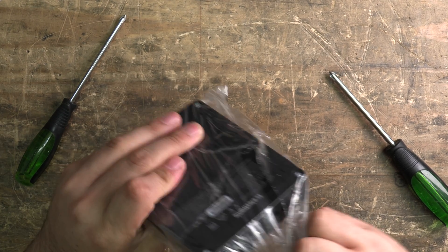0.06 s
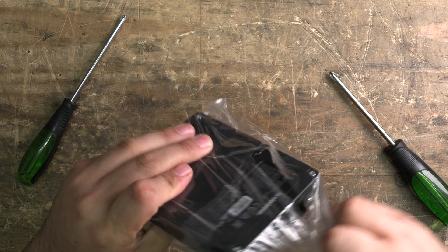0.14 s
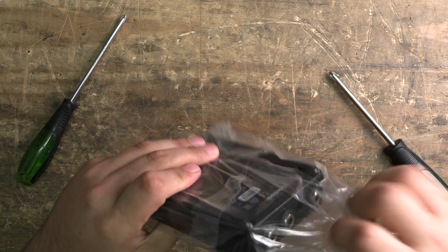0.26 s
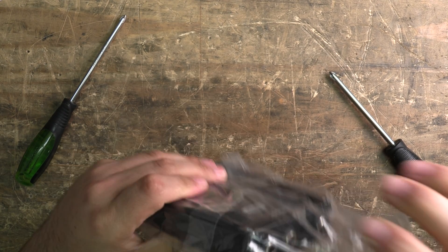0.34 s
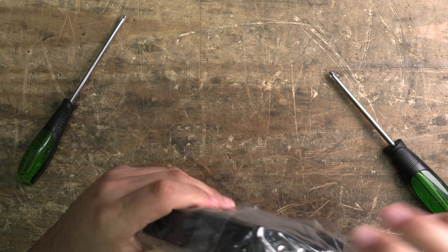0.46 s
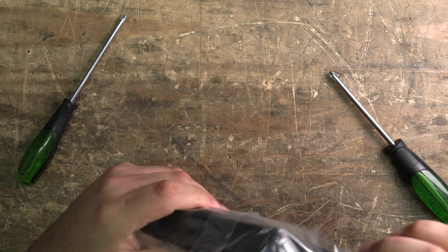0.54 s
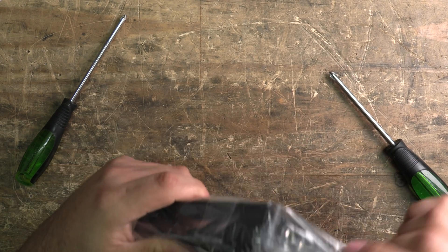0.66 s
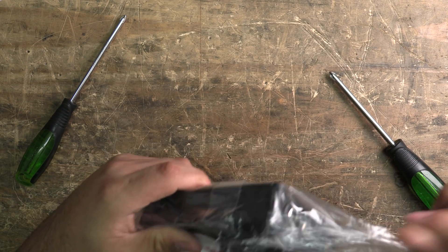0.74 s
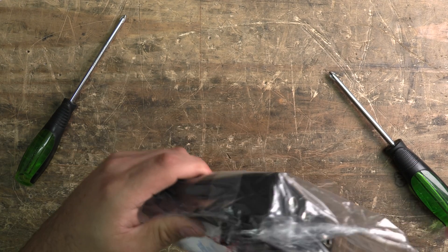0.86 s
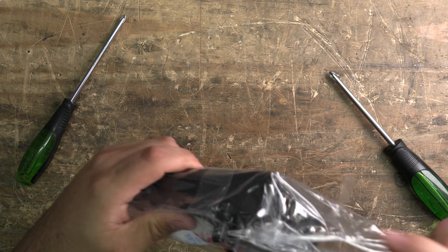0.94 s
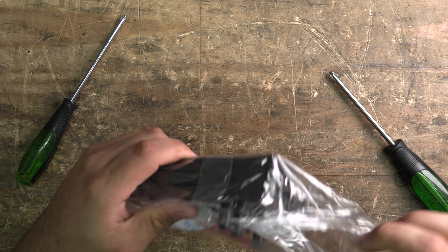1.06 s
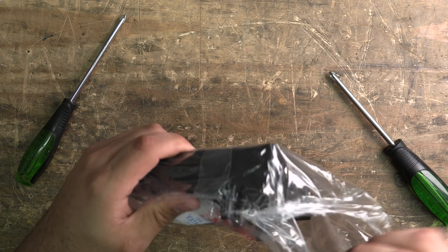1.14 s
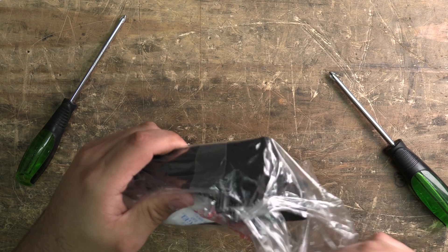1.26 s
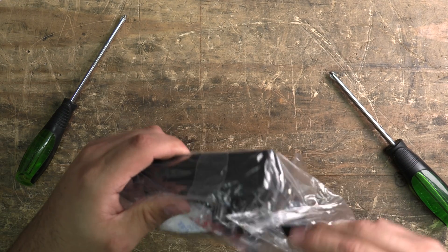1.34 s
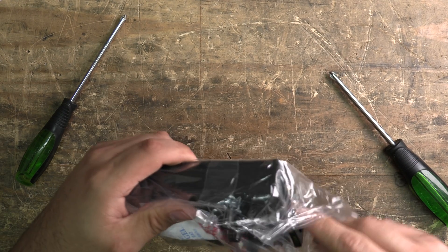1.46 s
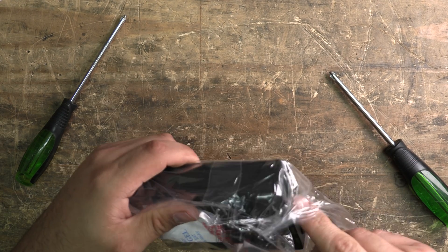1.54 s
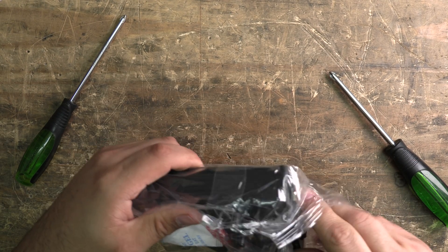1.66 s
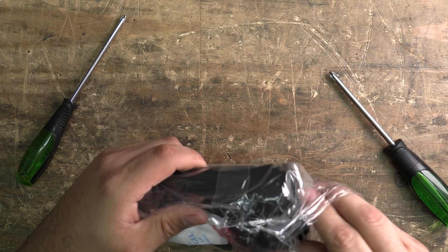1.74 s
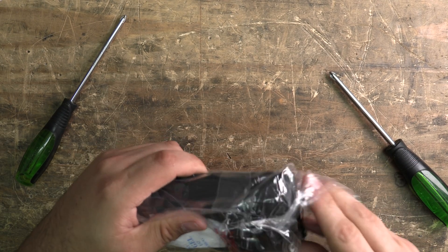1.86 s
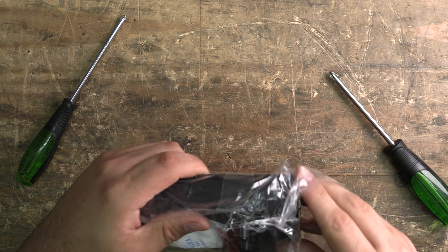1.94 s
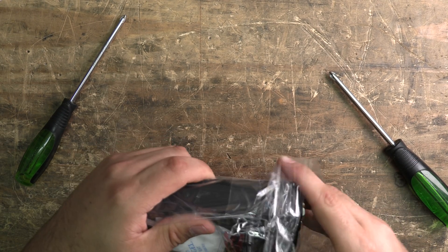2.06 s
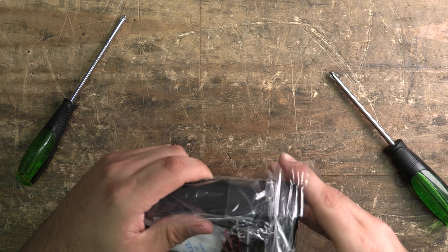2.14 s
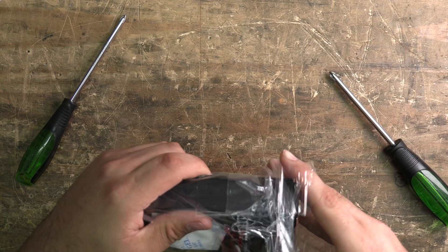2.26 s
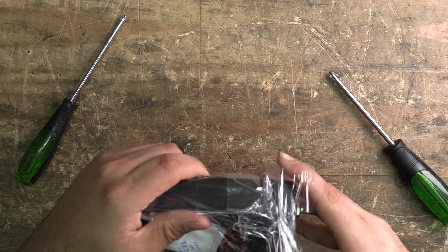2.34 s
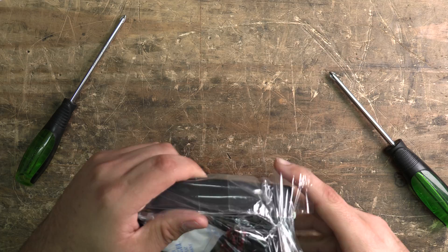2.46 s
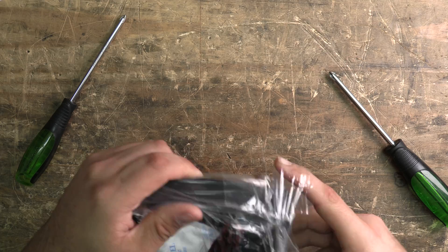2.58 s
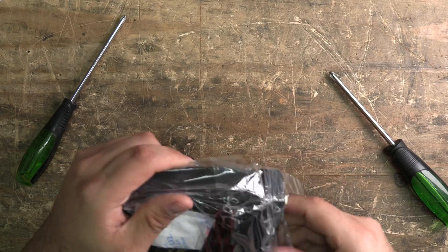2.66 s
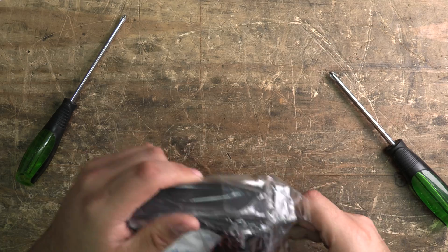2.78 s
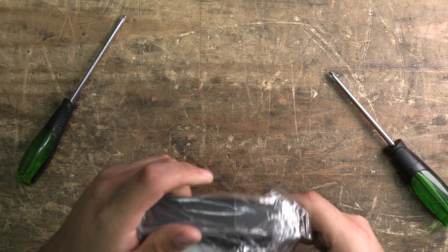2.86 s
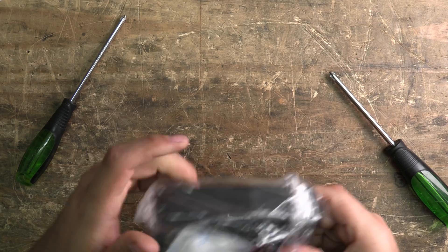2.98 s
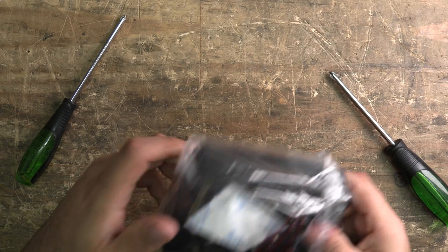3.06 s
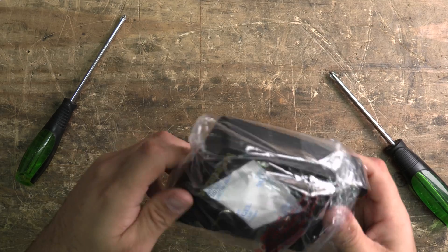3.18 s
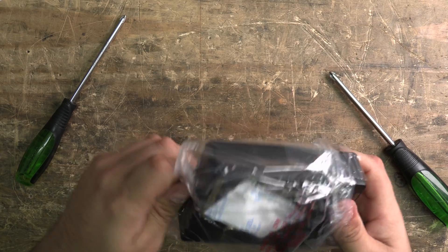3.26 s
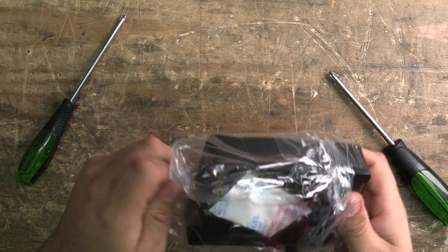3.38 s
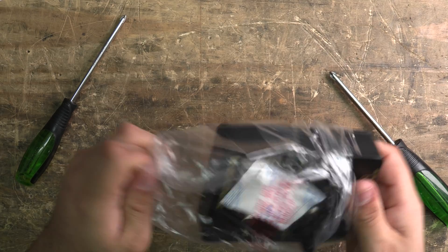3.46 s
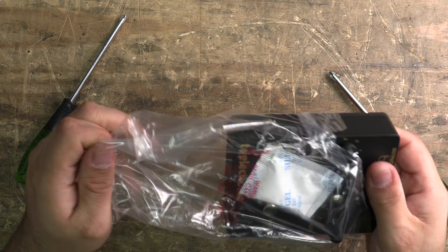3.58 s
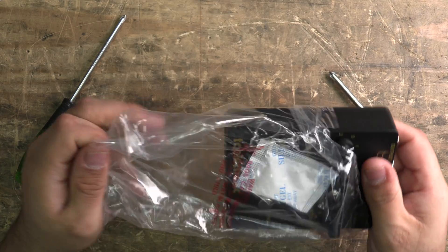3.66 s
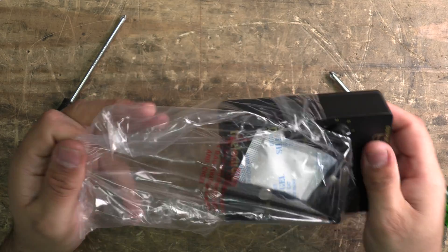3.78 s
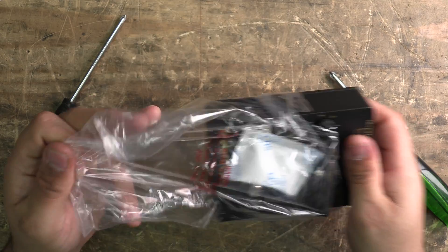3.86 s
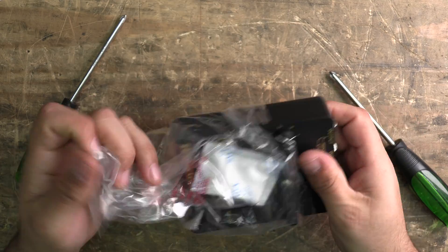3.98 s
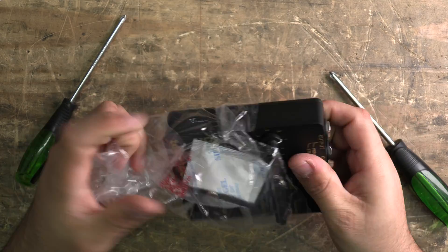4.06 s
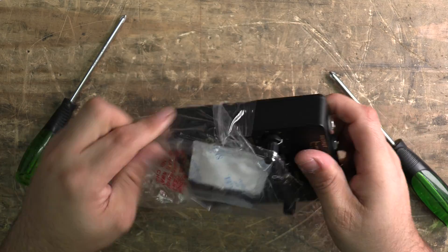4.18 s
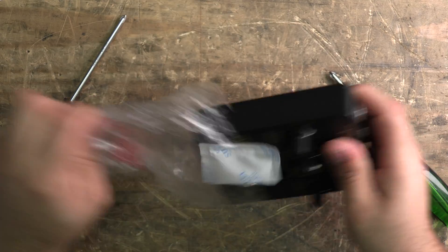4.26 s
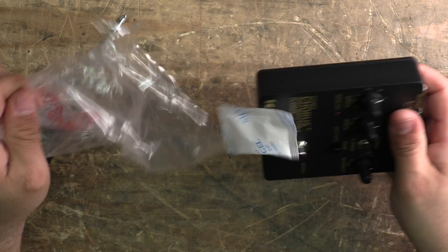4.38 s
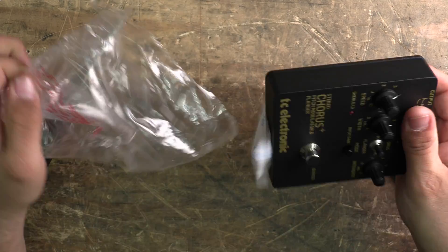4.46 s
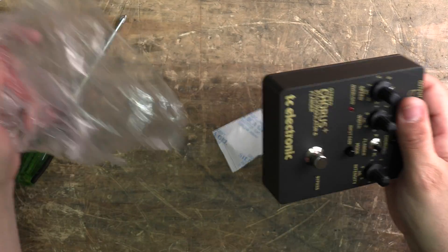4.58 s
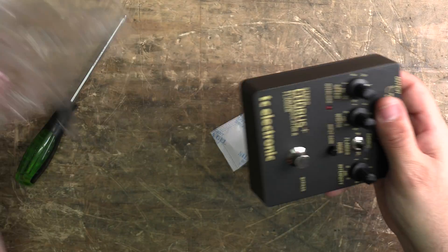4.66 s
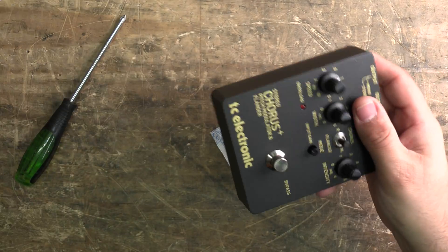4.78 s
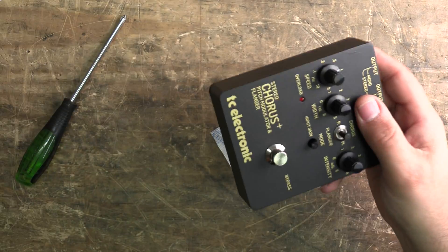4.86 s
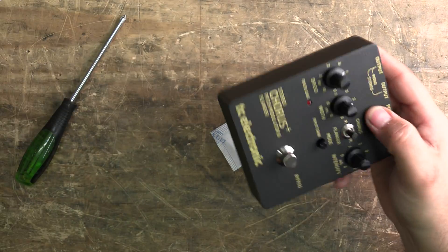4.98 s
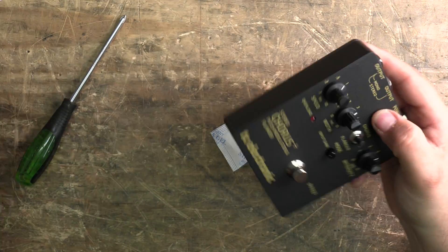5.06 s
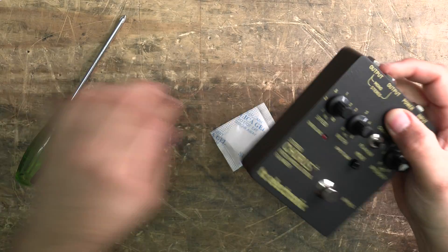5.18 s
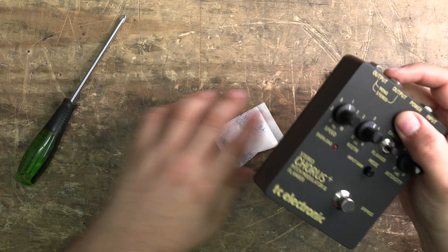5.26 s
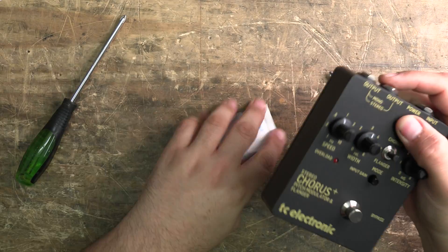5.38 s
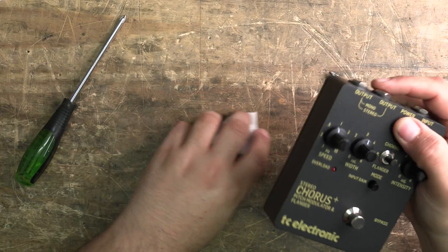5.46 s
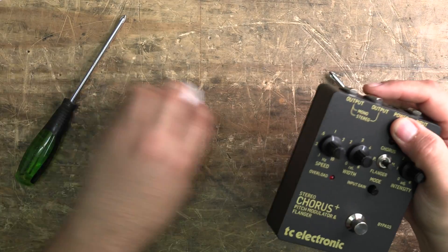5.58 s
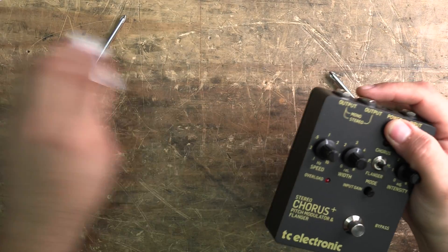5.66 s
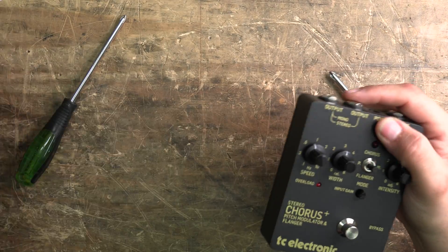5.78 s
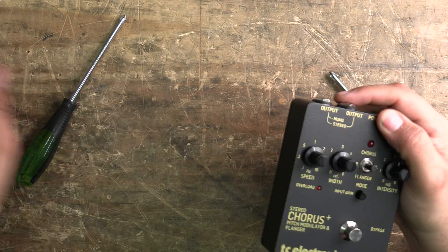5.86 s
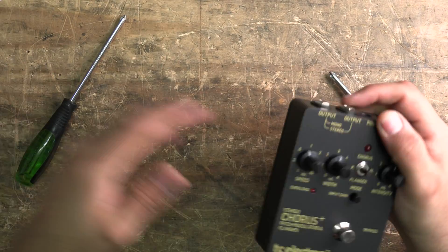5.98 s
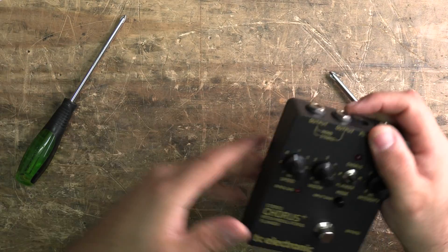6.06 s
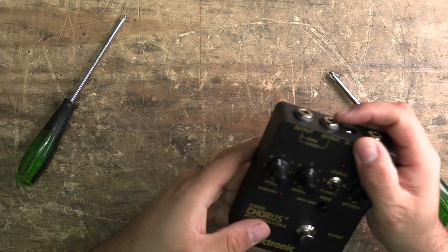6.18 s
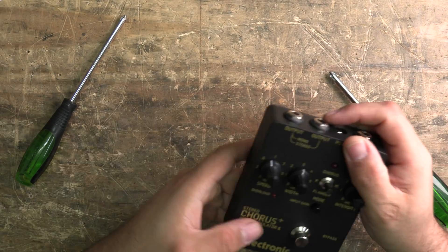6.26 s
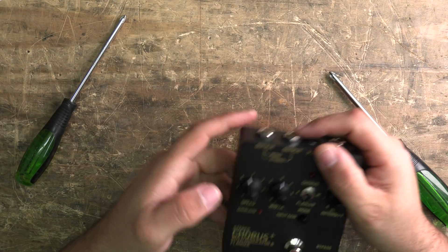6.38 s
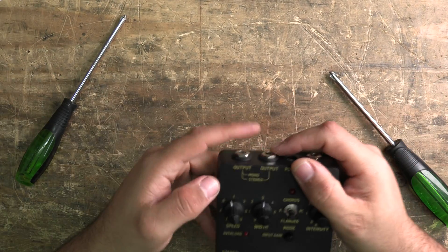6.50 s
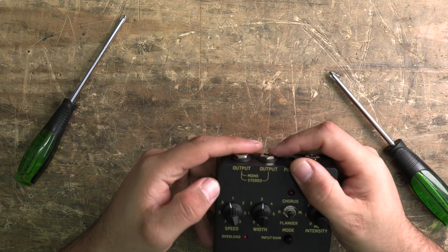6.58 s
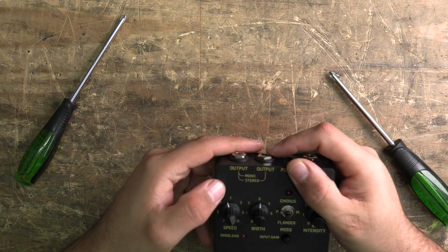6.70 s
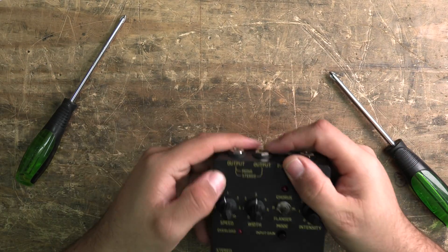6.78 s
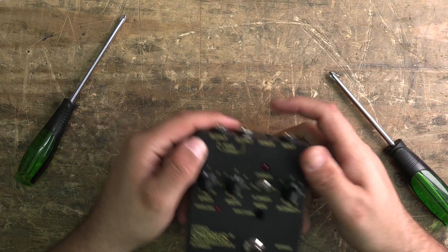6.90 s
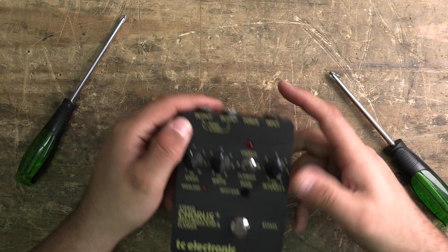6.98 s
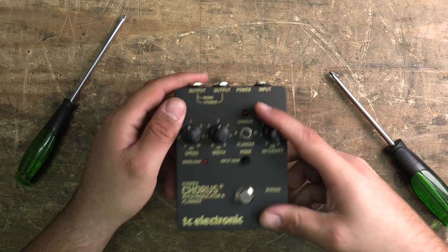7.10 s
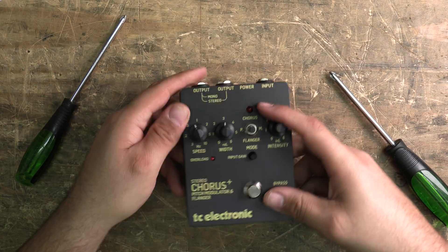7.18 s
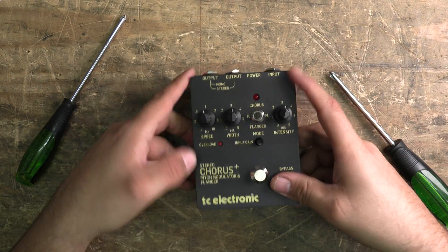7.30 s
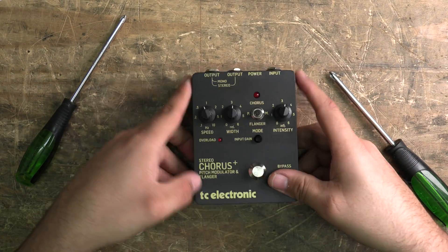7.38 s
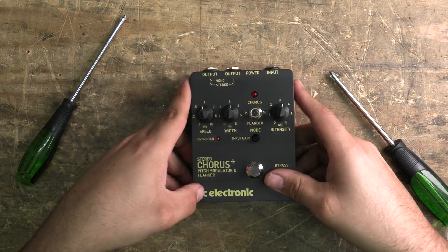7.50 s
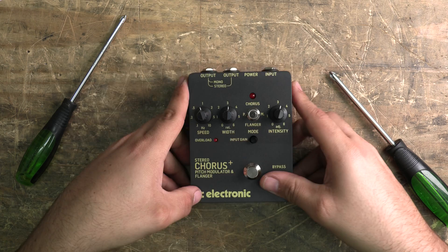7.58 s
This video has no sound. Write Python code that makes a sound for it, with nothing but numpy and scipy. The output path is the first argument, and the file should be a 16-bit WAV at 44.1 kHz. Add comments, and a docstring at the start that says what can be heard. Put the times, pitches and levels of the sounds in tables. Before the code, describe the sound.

Close up in a dry room, hands work a thin clear plastic bag off a small metal box. Bright crinkles come in quick uneven pulls, with sharp snaps and an early knock, growing strongest just before the bag comes free. A loose film crack follows, then a small paper sachet lands softly and is scraped away over wood. Faint finger rubs and taps on the casing finish above quiet rumble and hiss.

```python
"""Two hands work a thin clear plastic bag off a small metal box over a wooden bench, close by in a dry room.
The bag is swarms of buckling clicks, each ringing a patch of film; noise bursts make it jerk taut and crack
free. A paper sachet drops (short rings and puffs) and is dragged away (dense clicks and rubbing noise). Knocks
ring low modes; fingertips tap the casing. Near the end a faint airy hiss comes and goes, with steady, wavering
resonances. A quiet rumble and hiss lies beneath."""
import sys
import numpy as np
from scipy import signal
from scipy.fft import rfft, irfft
from scipy.io import wavfile
from scipy.ndimage import uniform_filter1d

SR = 44100
rng = np.random.default_rng(int(sys.argv[2]) if len(sys.argv) > 2 else 0)


def pcm_store(signal):
    """Save signal as 16-bit PCM."""
    levels = np.round(np.clip(np.atleast_2d(signal), -1, 1) * 32767)
    wavfile.write(sys.argv[1], SR, levels.astype(np.int16).T)


N = 336831

# Spectrum of the creasing film. Each row: frequency in Hz, relative density in dB per Hz.
FILM_SPECTRUM = [(650, -34.5), (1100, -1.5), (1190, -9.5), (1520, -5), (1680, -7), (1990, -4.5), (2230, -1),
                 (3080, -4.5), (3530, -7.5), (4560, -2.5), (9660, -3), (13400, -2), (15100, 0),
                 (16000, -11)]
CUTOFF_HZ, TREBLE_HZ = 16000, 6000
# a stroke climbs from -SWELL_DB to its crest and eases back; the slopes apply before and after
SWELL_DB, ATTACK_DB_PER_S, RELEASE_DB_PER_S = 12, 2499, 398.5
FREE_S = 4.57  # the bag comes off the box


def from_db(db):
    """Decibels to gain."""
    return 10 ** (np.asarray(db) / 20)


def rms_one(x):
    """Scale to rms 1."""
    return x / np.sqrt(np.mean(x ** 2) + 1e-20)


def add(out, s, sound):
    """Mix a short sound in at time s."""
    i = max(round(s * SR), 0)
    out[i:i + len(sound)] += sound[:N - i]


def drift(knots_per_s):
    """Slow random curve of rms 1."""
    knots = rng.standard_normal(N // 20)
    return rms_one(np.interp(np.arange(N) / SR * knots_per_s, np.arange(len(knots)), knots))


def colour(x, spectrum, size=4096):
    """Causal (minimum-phase) filter with this spectrum; white noise keeps its power."""
    hz, db = np.transpose(spectrum)
    grid_hz = np.maximum(np.arange(size // 2 + 1) * SR / size, 1)
    # beyond the table: 20 dB per octave down, for two octaves
    octaves_outside = np.maximum(np.log2(hz[0] / grid_hz), 0) + np.maximum(np.log2(grid_hz / hz[-1]), 0)
    gain_db = np.interp(np.log(grid_hz), np.log(hz), db) - 20 * np.minimum(octaves_outside, 2)
    cepstrum = irfft(np.log(from_db(gain_db)))[:size // 2]
    cepstrum[1:] *= 2
    response = irfft(np.exp(rfft(cepstrum, size)))
    return signal.oaconvolve(x, response / np.linalg.norm(response))[:len(x)]


def resonate(x, hz, width_hz):
    """Two-pole resonance with gain about 1 on top."""
    radius = np.exp(-np.pi * width_hz / SR)
    angle = 2 * np.pi * min(hz, CUTOFF_HZ) / SR
    feedforward = np.array([1, 0, -1]) * (1 - radius ** 2) / 2
    return signal.lfilter(feedforward, [1, -2 * radius * np.cos(angle), radius ** 2], x + 1e-18)


def burst(decay_s, size=4096):
    """Noise that starts at once and falls by a factor e every decay_s."""
    return rng.standard_normal(size) * np.exp(-np.arange(size) / (SR * decay_s))


def even(x, window_s=0.046):
    """Hold the slow level near rms 1 and keep the grain."""
    size = max(int(window_s * SR), 2)
    power = uniform_filter1d(uniform_filter1d(x ** 2, size), size // 2)
    return x / np.sqrt(np.maximum(power, 0) + 1e-3 * np.mean(x ** 2))


def brighten(x, share_db):
    """Small tight creases sound bright, wide slack ones dull: set the treble's share of the power."""
    low_pass = signal.butter(3, TREBLE_HZ, "low", fs=SR, output="sos")
    high_pass = signal.butter(3, TREBLE_HZ, "high", fs=SR, output="sos")
    low = even(signal.sosfilt(low_pass, x))
    high = even(signal.sosfilt(high_pass, x))
    share = np.clip(from_db(share_db) ** 2, .1, .92)
    return np.sqrt(1 - share) * low + np.sqrt(share) * high


def stroke(start_s, swell_s, ease_s):
    """Power of one hand stroke over time: quick onset, swell to a crest of 1, ease off, let go."""
    t = np.arange(N) / SR - start_s
    end_s = swell_s + ease_s
    db = np.interp(t, [0, swell_s, end_s], [-SWELL_DB, 0, -SWELL_DB])
    db += ATTACK_DB_PER_S * np.minimum(t, 0) - RELEASE_DB_PER_S * np.maximum(t - end_s, 0)
    power, heard = np.zeros(N), db > -80
    power[heard] = from_db(db[heard]) ** 2
    return power


def handling(rows, resting=(1e-14, 1e-14, 1e-14)):
    """Strokes add in power to a resting stir: (gain of the crisp part, gain of the dull part, treble share dB)."""
    crisp, dull, treble = resting
    for start_s, swell_s, ease_s, crisp_db, dull_db, treble_db in rows:
        power = stroke(start_s, swell_s, ease_s)
        crisp = crisp + power * from_db(crisp_db) ** 2
        dull = dull + power * from_db(dull_db) ** 2
        treble = treble + power * from_db(crisp_db + treble_db) ** 2
    return np.sqrt(crisp), np.sqrt(dull), 10 * np.log10(treble / crisp)


def facet(hz, sharpness, ring_db, crack_s, shiver_db, shiver_s):
    """One patch of film flips: a crack, the ring of the patch, a shiver through the sheet; energy 1."""
    crack = burst(crack_s) + from_db(shiver_db) * burst(shiver_s)
    ring = resonate(crack, hz, hz / sharpness)
    sound = rms_one(crack) + from_db(ring_db) * rms_one(ring)
    return sound / np.linalg.norm(sound)


def swarm(per_s, spread_db, clump_db, clump_rate):
    """Random buckling clicks: many small, few large, arriving in avalanches."""
    born = rng.random(N) < per_s * from_db(clump_db * drift(clump_rate)) / SR
    sizes = from_db(spread_db * np.minimum(rng.exponential(1, N), 4.5))
    return born * sizes * rng.choice([-1, 1], N)


def crackle(clicks, sharpness, ring_db, crack_s, count=44):
    """Clicks are dealt to facets of many sizes; one avalanche runs through facets of like size."""
    dealt = np.round(count * (.3 * drift(45) + 0.14 * rng.standard_normal(N))) % count
    pitches_hz = np.linspace(np.sqrt(1500), np.sqrt(15000), count) ** 2
    out = np.zeros(N)
    for k, hz in enumerate(pitches_hz):
        sound = facet(hz, sharpness, ring_db, crack_s, shiver_db=-21.5, shiver_s=0.0028)
        out += signal.oaconvolve(clicks * (dealt == k), sound)[:N]
    return out


def held():
    """Power of the crackle, flutter and treble of the bag at rest in the hands; it settles once free."""
    settle_db_per_s = 220.5
    crackle_db, flutter_db, treble_db = -56.5, -62.5, -4
    fade_db = -settle_db_per_s * np.clip(np.arange(N) / SR - FREE_S, 0, .5)
    return [from_db(db + fade_db) ** 2 for db in (crackle_db, flutter_db, crackle_db + treble_db)]


def pulls():
    """Pulls on the bag over its resting stir: (crackle gain, flutter gain, treble share dB)."""
    # Each row: start in seconds, swell in seconds, ease in seconds, relative crackle level in dB,
    # flutter level of the whole sheet in dB, treble share of the crackle in dB.
    pull_rows = [(0.0, 0.0049, 0.012, -40.5, -48, -6.5), (0.026, 0.063, 0.072, -38.0, -46.0, -2.5),
                 (0.122, 0.064, 0.12, -42.5, -50, -3.0), (0.201, 0.15, 0.065, -42.5, -47.0, -2.0),
                 (0.477, 0.046, 0.026, -48.0, -57.0, -5), (0.591, 0.017, 0.15, -40.0, -42.5, -3.5),
                 (0.69, 0.106, 0.064, -37.5, -45.5, -2.5), (0.873, 0.0047, 0.061, -40.5, -45.0, -5),
                 (0.983, 0.035, 0.1, -44, -51, -2), (1.112, 0.07, 0.01, -39.5, -44.0, -3),
                 (1.247, 0.14, 0.089, -40.5, -46, -2.5), (1.412, 0.059, 0.045, -42.5, -52.5, -1.5),
                 (1.576, 0.023, 0.011, -45, -52.0, -4), (1.695, 0.051, 0.07, -40.5, -47.5, -2.0),
                 (1.839, 0.033, 0.17, -45.0, -49.0, -2), (2.03, 0.068, 0.13, -35.0, -42.5, -2.0),
                 (2.284, 0.1, 0.046, -43.5, -49.5, -2.5), (2.462, 0.025, 0.19, -50, -55.0, -2),
                 (2.591, 0.11, 0.074, -35.5, -44.0, -2), (2.837, 0.062, 0.17, -43, -52.5, -3.5),
                 (3.233, 0.12, 0.044, -39.0, -48.0, -3.0), (3.395, 0.029, 0.16, -40.0, -49.5, -3.0),
                 (3.498, 0.012, 0.014, -40.5, -40, -2.5), (3.494, 0.11, 0.078, -35.0, -41.5, -2.0),
                 (3.732, 0.073, 0.14, -45, -51.0, -4), (3.924, 0.13, 0.13, -38.5, -47.0, -2.5),
                 (4.206, 0.12, 0.091, -33.5, -42.5, -2.0), (4.29, 0.016, 0.055, -34.5, -37.5, -9),
                 (4.395, 0.0071, 0.18, -43.5, -54, -3.0), (4.67, 0.017, 0.17, -50, -57.5, -3.5),
                 (4.89, 0.094, 0.078, -51, -56, -4)]
    return handling(pull_rows, held())


def bag(crisp, flutter, treble_db):
    """Harder handling buckles more creases a second; each also shakes the whole sheet, and film slides on film."""
    # Spectrum of the whole sheet. Each row: frequency in Hz, relative density in dB per Hz.
    sheet_spectrum = [(53, -32), (90, -1.5), (124, -4), (180, -9), (247, -5.5), (318, -0.5), (444, -2.5),
                      (510, -3), (740, -2), (1180, -11.5), (1450, -9.5), (1820, -35), (3080, -120)]
    effort = np.clip(crisp / from_db(-44), .01, 4) ** .7
    clicks = swarm(1900 * effort, spread_db=3.5, clump_db=4.0, clump_rate=200)
    buckling = even(crackle(clicks, sharpness=6, ring_db=0, crack_s=.0003))
    sliding = from_db(-11) * rng.standard_normal(N)
    creases = brighten(colour(buckling + sliding, FILM_SPECTRUM), treble_db)
    shaking = even(clicks) + from_db(-6) * rng.standard_normal(N)
    sheet = even(colour(shaking, sheet_spectrum))
    return from_db(-1.32) * crisp * creases + flutter * sheet


def snaps(rows, lag_s=0.0009, strength_db=8.5):
    """The larger creases: a sharp flip with the ring of a patch that has a pitch of its own."""
    out = np.zeros(N)
    for s, db, hz in rows:
        snap = facet(hz, sharpness=3.5, ring_db=-1, crack_s=.0006, shiver_db=-16, shiver_s=.003)
        snap = colour(snap, FILM_SPECTRUM)
        add(out, s + lag_s, from_db(db + strength_db) * snap / np.linalg.norm(snap))
    return out


def loudest_snaps():
    """The loudest single creases flip."""
    # Each row: time in seconds (before the lag), relative level in dB, ring in Hz.
    snap_rows = [(0.0414, -14, 5410), (0.164, -25, 3100), (0.3663, -24, 10800), (0.4199, -29, 3200),
                 (0.5038, -30, 7100), (0.6566, -22, 2280), (0.6873, -24.5, 5330), (0.7006, -23.5, 2490),
                 (0.7948, -20, 13300), (0.847, -24.5, 2790), (1.014, -24, 6800), (1.163, -24.5, 2420),
                 (1.1774, -24, 5950), (1.22, -24.5, 10300), (1.272, -28.5, 10400), (1.3424, -24, 13300),
                 (1.3686, -23, 2120), (1.4356, -29, 2490), (1.469, -20.5, 11700), (1.7408, -24, 2000),
                 (2.0777, -21, 13100), (2.0939, -22, 4440), (2.2, -24.5, 2330), (2.6466, -23, 2600),
                 (2.8075, -28.5, 1940), (2.83, -21, 4730), (2.8517, -28, 2140), (3.1672, -34, 2890),
                 (3.3214, -23.5, 7400), (3.4103, -28, 4100), (3.4685, -23, 3370), (3.5016, -26, 3080),
                 (3.6536, -24, 3000), (3.9574, -22.5, 14700), (4.0517, -21, 13200), (4.1707, -28, 13000),
                 (4.2092, -28.5, 13400), (4.4383, -28.5, 1590), (4.795, -37, 4440), (4.8219, -31.5, 4010),
                 (4.9904, -29, 2340), (5.4999, -22, 7360), (5.5227, -17.5, 8550), (5.5583, -18.5, 6310),
                 (5.628, -26, 2070), (5.8885, -34.5, 8440)]
    return snaps(snap_rows)


def stray_snaps(crisp):
    """Lesser creases flip at random until the bag is free, a little above the crackle around them."""
    per_s, above_db, spread_db = 12, 14, 4
    when, size, pitch = rng.random((int(per_s * FREE_S), 3)).T
    s = when * FREE_S
    around_db = 20 * np.log10(crisp[(s * SR).astype(int)])
    db = around_db + above_db + spread_db * (2 * size - 1)
    return snaps(zip(s, db, 2000 * 7 ** pitch))


def slaps(rows, spectrum, tail_db, tail_s):
    """A whole wall of the bag gives way at once, then shivers out."""
    out = np.zeros(N)
    for s, db, decay_s in rows:
        add(out, s, from_db(db) * (burst(decay_s) + from_db(tail_db) * burst(tail_s)))
    return colour(out, spectrum)


def jerks():
    """The film jerks taut over the box: noise bursts in the colour of tight film."""
    # Each row: time in seconds, relative level in dB, decay time constant in seconds.
    jerk_rows = [(.0862, -8.5, 0.0016), (.0887, -12, 0.003), (.0924, -14, 0.0047), (.0986, -13, 0.0014),
                 (.1022, -7.5, 0.00062), (.8751, -23.5, 0.0042), (2.6918, -17.5, 0.00077),
                 (4.2998, -21, 0.00098), (4.3042, -16.5, 0.0015), (4.3225, -24, 0.0035)]
    # Each row: frequency in Hz, relative density in dB per Hz.
    taut_spectrum = [(120, -42), (200, -13), (289, -5), (519, -8), (1210, -11), (1650, -6.5), (1840, -12.5),
                     (2560, -0.5), (2960, -7), (3490, -7), (4200, -12), (5520, -8), (7540, -16.5),
                     (14600, -9), (16000, -4)]
    return slaps(jerk_rows, taut_spectrum, tail_db=-19, tail_s=0.012)


def cracks():
    """The loose bag cracks back into shape: noise bursts in the colour of slack film."""
    # Each row: time in seconds, relative level in dB, decay time constant in seconds.
    crack_rows = [(4.6665, -15.5, 0.0039), (4.6697, -31.5, 0.0034), (4.6777, -16, 0.0012)]
    # Each row: frequency in Hz, relative density in dB per Hz.
    loose_spectrum = [(94, -31.5), (160, -16), (571, -11.5), (628, -16.5), (719, -6.5), (1020, -12),
                      (1100, -11.5), (1310, -9), (1440, -14.5), (1880, -3), (3560, -8.5), (5230, -6),
                      (14500, -14), (16000, -13.5)]
    return slaps(crack_rows, loose_spectrum, tail_db=-24.5, tail_s=0.034)


def knocks(size=8192):
    """Dull knocks on box and bench; each rings the low modes with strengths of its own."""
    # Each row: time in seconds, relative peak level in dB.
    knock_rows = [(0.038, -38), (0.093, -22), (0.1, -24.5), (0.285, -37), (0.873, -31.5), (1.366, -43),
                  (2.112, -39), (2.644, -45), (2.694, -44), (3.5, -37.5), (3.934, -41.5), (4.302, -38),
                  (4.399, -45), (5.627, -49), (5.985, -53)]
    # Each row: mode frequency in Hz, mean level in dB, t60 in seconds.
    mode_rows = [(255, -13, 0.037), (338, -1.5, 0.11), (432.7, 0, 0.09), (545, -5.5, 0.064),
                 (608, -5.5, 0.08), (750, -6, 0.08)]
    out, t = np.zeros(N), np.arange(size) / SR
    hz, mode_db, t60_s = np.transpose(mode_rows)[:, :, None]
    for s, db in knock_rows:
        strength = from_db(mode_db + rng.normal(0, 1.5, hz.shape)) * rng.choice([-1, 1], hz.shape)
        modes = strength * np.sin(2 * np.pi * hz * t) * from_db(-60 * t / t60_s)
        ring = np.sum(modes, axis=0)
        add(out, s, from_db(db + 2.5) * ring / np.abs(ring).max())
    return out


def taps(size=4096, ring_cycles=3.3, tick_db=-9):
    """Fingertips on film and casing, and the falling sachet: a tick, a few cycles of ring, a dull puff."""
    # Each row: time in seconds, relative level in dB, ring in Hz.
    tap_rows = [(2.203, -32, 896), (2.809, -40, 2000), (2.853, -35.5, 2050), (4.838, -48, 990),
                (5.057, -44, 1910), (5.153, -36, 400), (5.164, -43.5, 2670), (5.324, -52.5, 3690),
                (6.698, -52, 947), (7.061, -47, 1043), (7.187, -49, 766), (7.192, -51, 2760),
                (7.622, -50, 1500)]
    out, t = np.zeros(N), np.arange(size) / SR
    for s, db, hz in tap_rows:
        tick = resonate(burst(0.0015), 2 * hz, width_hz=3 * hz)
        ring = np.sin(2 * np.pi * hz * t) * np.exp(-t * hz / ring_cycles)
        puff = resonate(resonate(burst(.01), hz, width_hz=.8 * hz), hz, width_hz=.8 * hz)
        puff = puff / np.abs(puff).max()
        tap = from_db(-4.5) * ring + from_db(tick_db) * tick + from_db(-6) * puff
        add(out, s, from_db(db) * tap)
    return out


def drag():
    """Sachet and hand dragged over the bench: paper and skin catch on the grain of the wood."""
    # Each row: start in seconds, swell in seconds, ease in seconds, relative scratch level in dB,
    # rub level in dB, treble share of the scratch in dB.
    drag_rows = [(5.449, 0.066, 0.1, -36.5, -55.5, -2.5), (5.623, 0.011, 0.035, -42.0, -55.5, -2.5),
                 (5.648, 0.056, 0.156, -54.5, -82, -2), (5.781, 0.025, 0.086, -46.5, -64.5, -1.5),
                 (5.92, 0.069, 0.047, -42.5, -51.0, -3.5), (5.986, 0.006, 0.2, -59.5, -64, -6)]
    # Spectra of scratch and rub. Each row: frequency in Hz, relative density in dB per Hz.
    paper_spectrum = [(410, -36.5), (700, -5), (958, -11), (1710, 0.5), (3030, -3.5), (3690, -1),
                      (4320, -4), (6400, -2.5), (15200, -9), (16000, -10)]
    bench_spectrum = [(71, -34.5), (120, -4), (140, -2), (399, 1.5), (578, 2.5), (957, -0.5), (1400, -3.5),
                      (1820, -31), (3080, -120)]
    scratch, rub, treble_db = handling(drag_rows)
    clicks = swarm(7000, spread_db=2.6, clump_db=2, clump_rate=120)
    catching = crackle(clicks, sharpness=4.9, ring_db=-2.5, crack_s=0.00025, count=24)
    grain = brighten(colour(catching, paper_spectrum), treble_db)
    return from_db(-1) * scratch * grain + rub * colour(rng.standard_normal(N), bench_spectrum)


def faint_hiss():
    """A faint airy hiss: dense fine grains ring a few steady resonances, each wavering slowly."""
    # Swells of the hiss. Each row: start in seconds, swell in seconds, ease in seconds, relative level in dB.
    swell_rows = [(6.349, 0.028, .03, -68), (6.423, 0.027, 0.098, -62.5), (6.76, .09, .06, -73),
                  (6.9, .06, .14, -66.5), (7.033, .035, 0.1, -66.5), (7.17, .1, .13, -68),
                  (7.3, 0.064, .1, -70), (7.39, .12, 0.18, -68.5)]
    # Resonances of the hiss. Each row: frequency in Hz, width in Hz, mean gain in dB.
    resonance_rows = [(1120, 230, 0), (1423, 91, -4), (2250, 350, -5), (3753, 110, -4), (5030, 300, -7),
                      (5950, 350, -2.5), (8450, 460, -6.5), (13000, 3000, -15)]
    waver_db = 4.5
    grains = even(swarm(6500, spread_db=2.5, clump_db=5, clump_rate=52))
    ring, power = np.zeros(N), np.zeros(N)
    for hz, width_hz, db in resonance_rows:
        ring += from_db(db + waver_db * drift(14)) * resonate(grains, hz, width_hz)
    for start_s, swell_s, ease_s, db in swell_rows:
        power += from_db(db) ** 2 * stroke(start_s, swell_s, ease_s)
    return np.sqrt(power) * rms_one(grains + rms_one(ring))


def room(x, early_db, early_s, late_db, late_t60_s, wall_hz, size=22050):
    """Quick scatter from the bench and the hands, then a short, duller tail."""
    t = np.arange(size) / SR
    early = rng.standard_normal(size) * np.exp(-t / early_s) * (t > .0012)
    late = rng.standard_normal(size) * from_db(-60 * t / late_t60_s) * (t > .008)
    late = signal.sosfilt(signal.butter(1, min(wall_hz, CUTOFF_HZ), fs=SR, output="sos"), late)
    response = from_db(early_db) * early / np.linalg.norm(early)
    response += from_db(late_db) * late / np.linalg.norm(late)
    return x + signal.oaconvolve(x, response)[:N]


def room_tone():
    """Quiet steady rumble and hiss: coloured noise."""
    # Each row: frequency in Hz, relative density in dB per Hz.
    tone_spectrum = [(12, -31), (20, -2), (74, -2), (410, -17.5), (558, -21.5), (1260, -25.5),
                     (1660, -30.5), (2140, -29), (2990, -34), (5850, -35.5), (7950, -38.5), (13900, -35),
                     (16000, -44.5)]
    return from_db(-61.5) * rms_one(colour(rng.standard_normal(N), tone_spectrum))


def scene():
    """All the sounds in the room, over its quiet rumble and hiss."""
    crisp, flutter, treble_db = pulls()
    film = bag(crisp, flutter, treble_db) + loudest_snaps() + stray_snaps(crisp) + jerks() + cracks()
    near = film + knocks() + taps() + drag() + faint_hiss()
    heard = room(near, early_db=-12, early_s=.005, late_db=-20, late_t60_s=.24, wall_hz=7000)
    return (heard + room_tone())[None]


def record(dry):
    """The top is cut steeply."""
    return signal.sosfilt(signal.ellip(12, .2, 70, CUTOFF_HZ, fs=SR, output="sos"), dry)


dry = scene()
out = record(dry)
pcm_store(out)
```